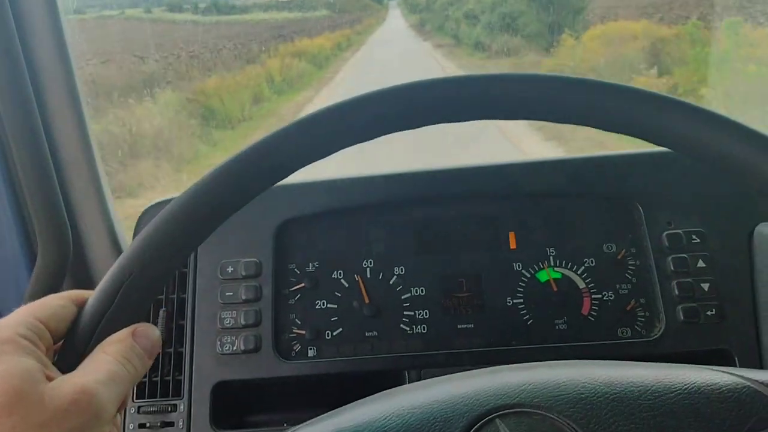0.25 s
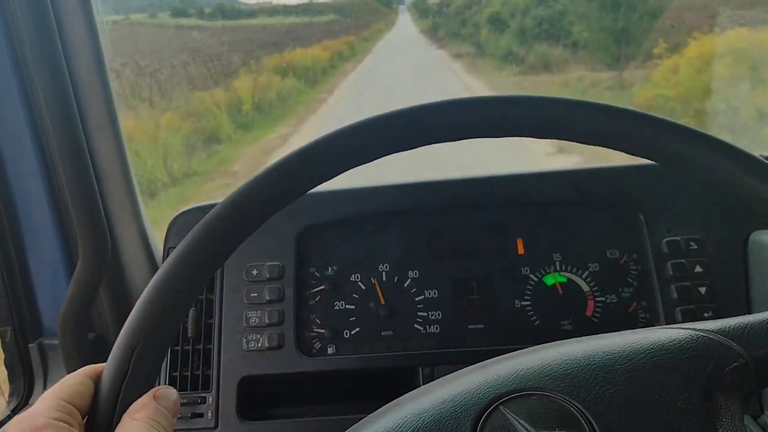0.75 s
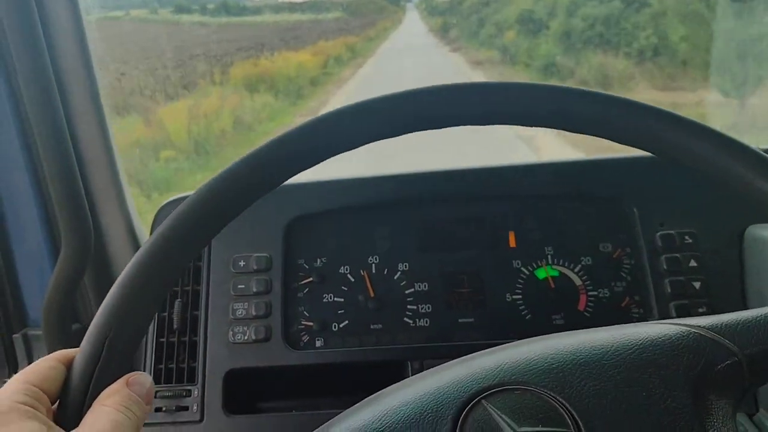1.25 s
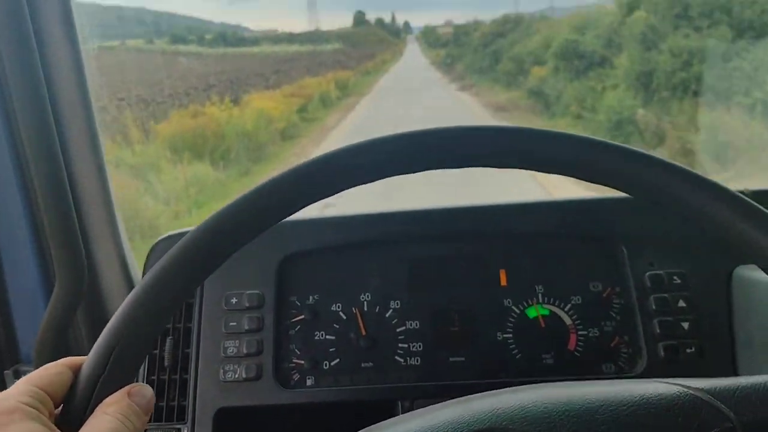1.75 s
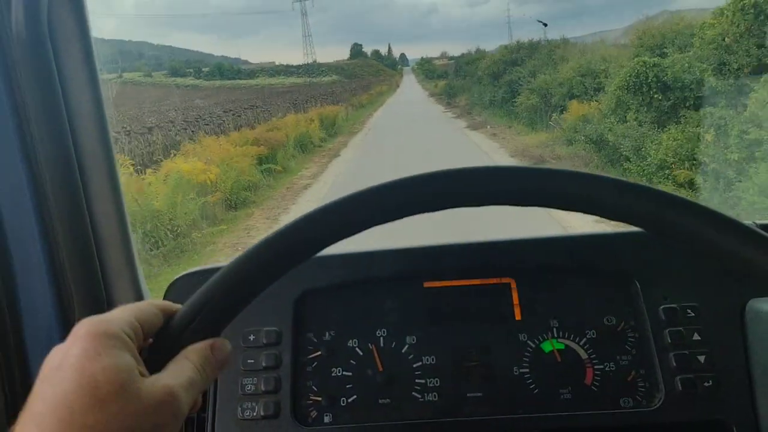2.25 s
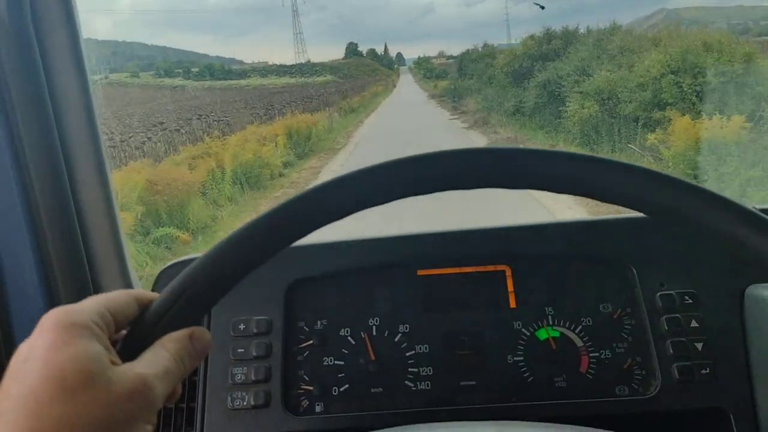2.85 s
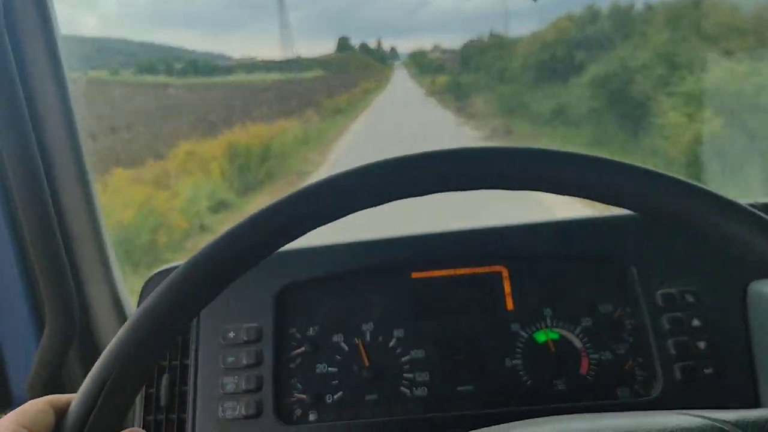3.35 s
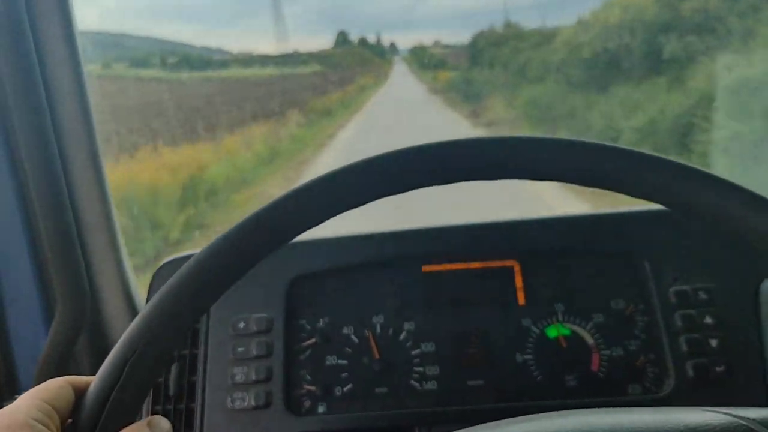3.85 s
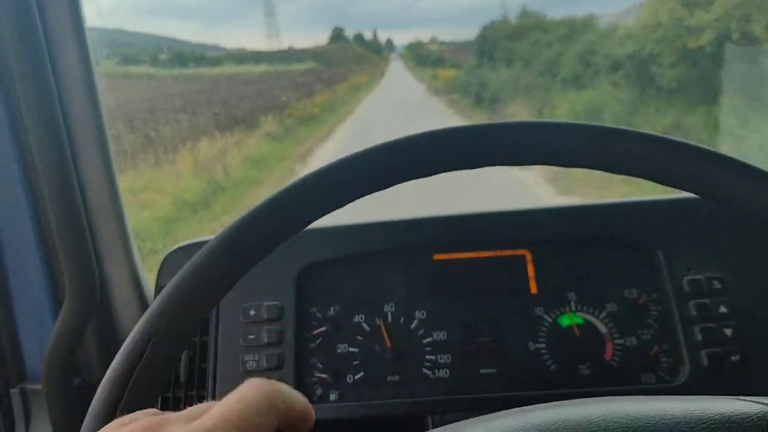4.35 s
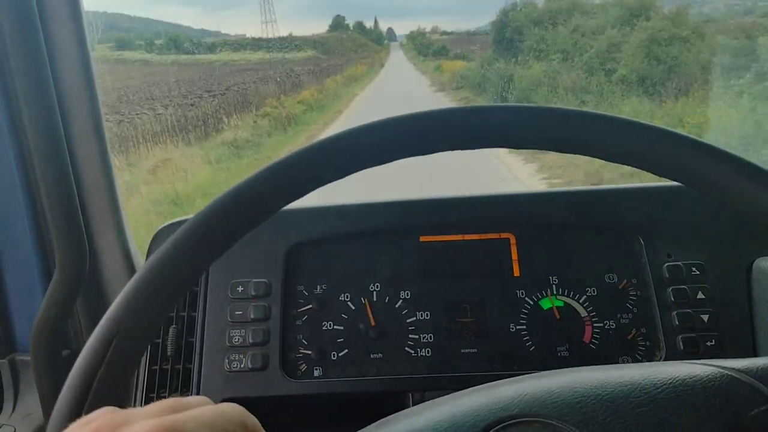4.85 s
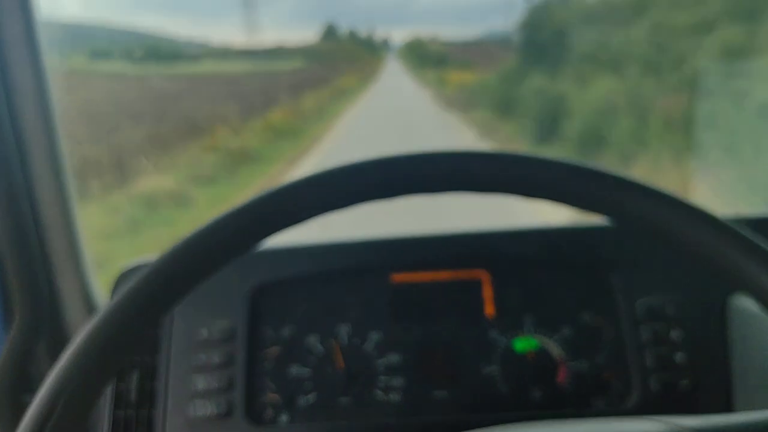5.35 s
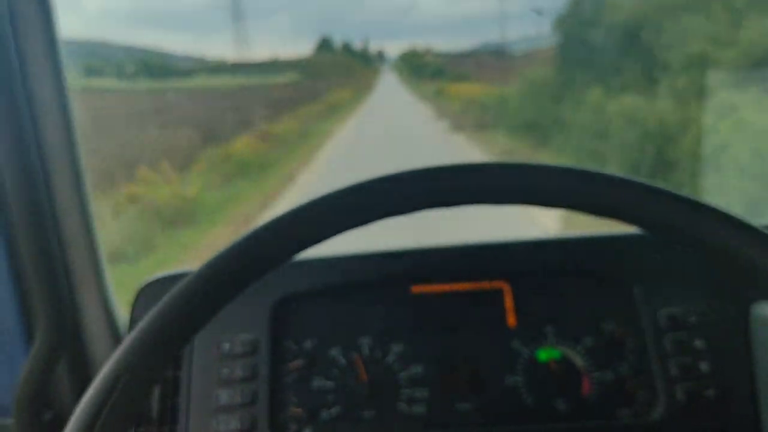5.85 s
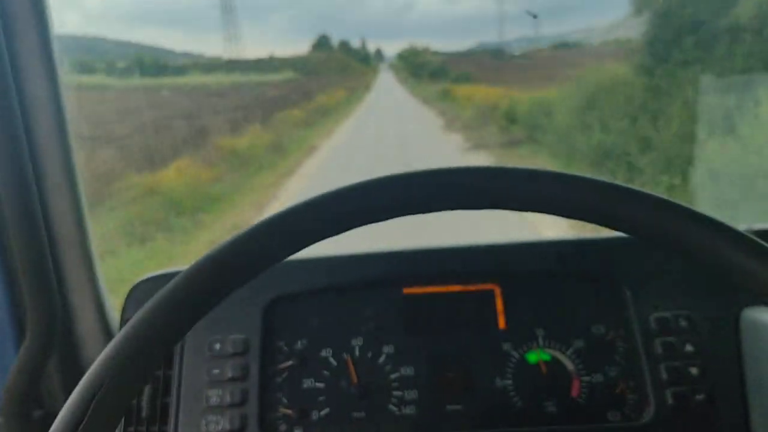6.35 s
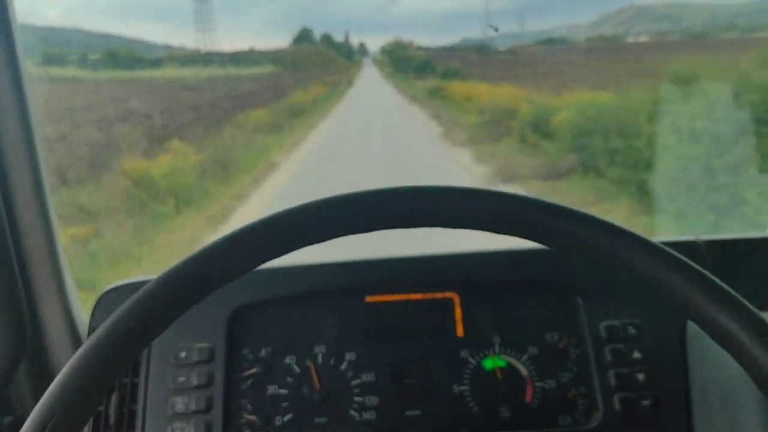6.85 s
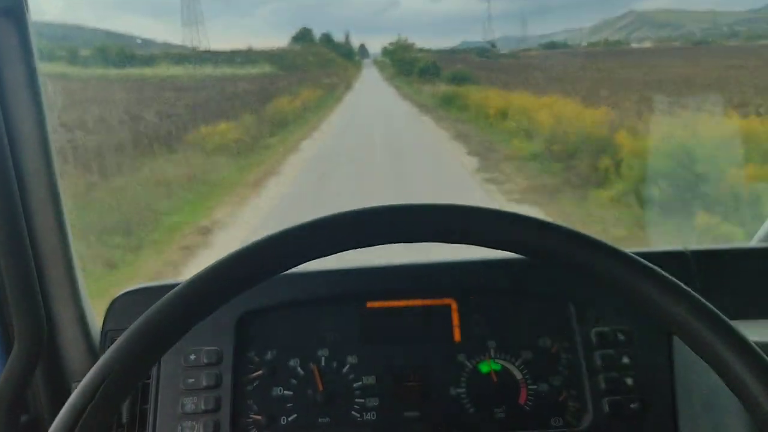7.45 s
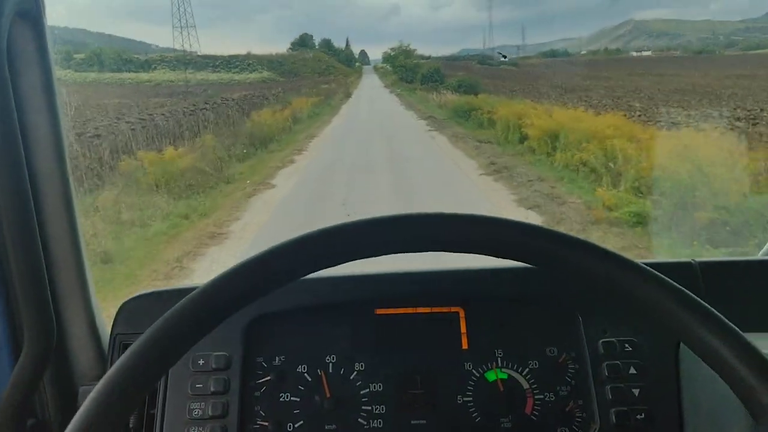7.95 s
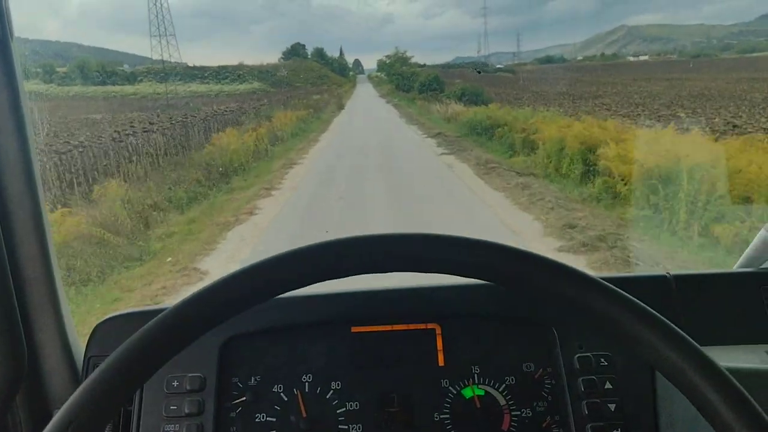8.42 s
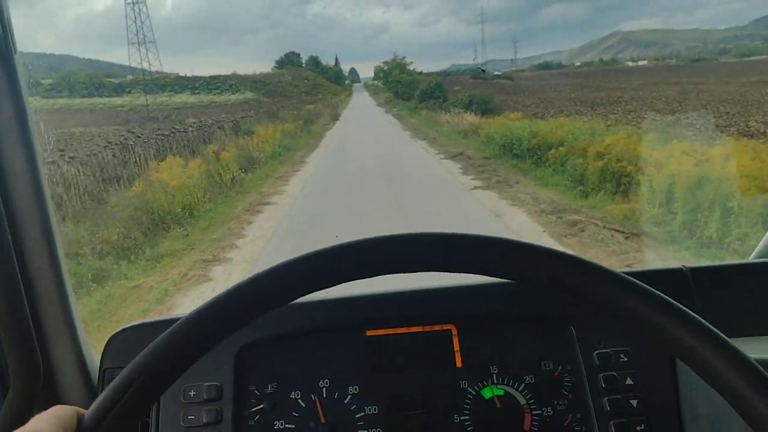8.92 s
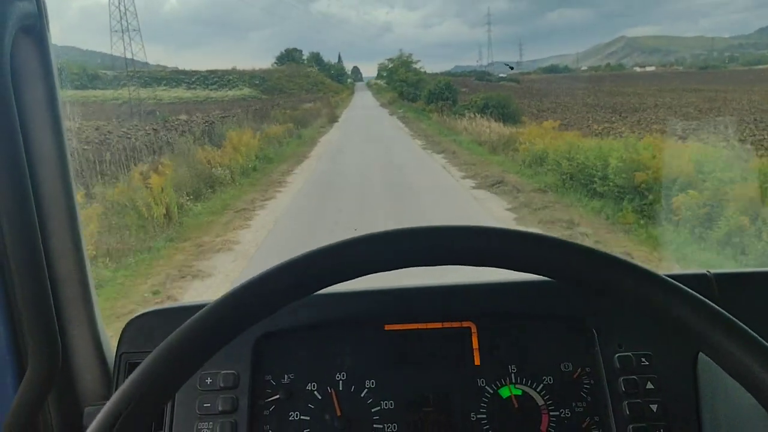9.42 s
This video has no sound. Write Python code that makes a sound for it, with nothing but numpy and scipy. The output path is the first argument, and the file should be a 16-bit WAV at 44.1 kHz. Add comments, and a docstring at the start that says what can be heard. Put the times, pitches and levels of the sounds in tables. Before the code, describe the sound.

From inside a truck cab, a diesel engine booms at constant speed, mixed with humming tyres, road roar and a light hiss of air. Bumps gently swell the low rumble. A short, bright plastic click comes near the start, and the trim gives brief, faint squeaks on the rougher stretch. The road noise then eases slightly as the truck keeps cruising.

```python
"""Inside the cab of a heavy truck on a narrow country road, its six-cylinder diesel near 1330 rpm.
The firings boom through the cab, the blocks of the tyre tread hum, and the cab rumbles on its mounts
over road roar and air hiss. On the rougher first stretch the seat and trim stick and slip in small
squeaks, and a loose plastic piece snaps once."""
import sys
import numpy as np
from scipy import signal
from scipy.fft import rfft, irfft
from scipy.io import wavfile
from scipy.ndimage import uniform_filter1d, map_coordinates

SR = 44100
rng = np.random.default_rng(int(sys.argv[2]) if len(sys.argv) > 2 else 0)


def generate_wav(signal):
    """Clip the signal to [-1, 1] and save it as 16-bit WAV at the path in sys.argv[1]."""
    frames = np.transpose(np.atleast_2d(signal))
    scaled = np.clip(frames, -1, 1) * 32767
    pcm = np.round(scaled).astype(np.int16)
    wavfile.write(sys.argv[1], SR, pcm)


N = 426888
TIME = np.arange(N) / SR
FREQS = np.arange(N // 2 + 1) * SR / N
SIDES = np.array([[1], [-1]])  # left, right
TOP_HZ = 15720

# The driver holds the speed and eases off a little: time_s, firing_hz, load_db (0 is steady cruise)
DRIVING = [(0.0, 65.96, 5), (0.7, 66.03, 2), (1.4, 66.57, 1.5), (2.1, 66.41, 0.3), (3.4, 66.48, 0),
           (4.8, 66.63, -0.1), (6.2, 66.73, -0.5), (7.6, 66.58, -1.5), (8.6, 66.6, -0.5), (9.68, 66.52, 0)]
# How much louder the left side is than the right: frequency_hz, left_minus_right_db
BALANCE = [(25, -1.8), (70, 1), (135, -1.5), (210, 1), (500, -2), (1100, -2.5), (2000, -6.5), (3500, -5),
           (5400, -5), (6700, 0), (7800, 5.5), (9500, 1.5), (10800, 0), (14000, 5.3)]


def undb(db):
    """Turn decibels into a gain to multiply by."""
    return 10 ** (np.asarray(db) / 20)


def unit(x):
    """Scale a signal to an average strength (rms) of 1."""
    return x / np.sqrt(np.mean(x ** 2))


def curves(table):
    """Turn each column of a timed table into one value per sample."""
    times, *columns = np.transpose(table)
    return [np.interp(TIME, times, column) for column in columns]


def colour(points):
    """Gain at every frequency, from rows of frequency_hz, level_db."""
    hz, db = np.transpose(points)
    return undb(np.interp(np.log(np.maximum(FREQS, 1)), np.log(hz), db))


def ringing(modes, hz=FREQS):
    """Gain of an object that rings: one peak for each of its resonances."""
    return sum(undb(db) / (1 + ((hz - centre) / width) ** 2) for centre, width, db in modes)


def wander(rate):
    """A smooth random curve of typical size 1 that changes about rate times a second."""
    steps = rng.standard_normal(int(N / SR * rate) + 4)
    coarse = map_coordinates(steps, [TIME[::64] * rate + 1], order=3)
    return unit(np.interp(TIME, TIME[::64], coarse))


def left_lead(hz):
    """How far the wave on the left runs ahead of the right, in radians."""
    # Head start on the left, shortened in the bass by standing waves: frequency_hz, lead_s
    leads = [(60, .0003), (130, .0005), (210, .00008), (600, .00016), (710, .00022), (830, .00038),
             (1050, .00051)]
    return 2 * np.pi * hz * np.interp(hz, *np.transpose(leads))


def cab_noise(gain):
    """Noise filling the cab: part reaches the left side first, part arrives from all round."""
    # How alike the two sides sound: frequency_hz, shared_fraction (capped at 1 below)
    likeness = [(40, 1.1), (120, 0.9), (230, 0.8), (330, 0.88), (500, 0.68), (1000, 0.49), (2000, 0.28),
                (4000, 0.17), (8000, 0.08), (13000, 0.13)]
    hz, share = np.transpose(likeness)
    common = np.interp(np.log(FREQS + 1), np.log(hz), np.clip(share, 0, 1))
    noise = rfft(rng.standard_normal((3, N)))
    direct = noise[2] * np.exp(.5j * SIDES * left_lead(FREQS))
    stereo = np.sqrt(common) * direct + np.sqrt(1 - common) * noise[:2]
    return unit(irfft(stereo * gain * colour(BALANCE) ** (SIDES / 2), N))


def engine(boom_db=-28, flutter_db=0.38, flutter_rise_db=0.0261, phase_wander=.006):
    """Six unequal cylinders repeat every two turns, making a stack of tones; higher ones waver more."""
    # Engine tones: order (times the cycle rate; 6 is the firing boom), level_db (relative to the boom)
    tones = [(2, -6), (3, -10.5), (6, 0), (9, -23), (12, -9.5), (13, -27), (15, -24.5), (17, -24),
             (18, -21), (21, -26), (24, -22.5), (27, -30), (29, -28.5), (33, -27), (39, -33), (40, -26.5),
             (53, -31), (55, -26.5), (57, -29), (60, -32), (64, -25), (67, -39), (73, -29.5), (79, -28),
             (87, -33)]
    # Tones that grow as the engine works harder: order, db_per_load_db
    load_growth = [(6, 1), (24, 1.3), (27, 2)]
    firing_hz, load_db = curves(DRIVING)
    cycle = 2 * np.pi * np.cumsum(firing_hz / 6) / SR
    out = np.zeros((2, N))
    for order, db in tones:
        hz = order * np.mean(firing_hz) / 6
        phase = order * (cycle + phase_wander * wander(7)) + rng.uniform(0, 2 * np.pi)
        level_db = boom_db + db + load_db * dict(load_growth).get(order, 0)
        waver_db = (flutter_db + flutter_rise_db * order) * wander(11)
        side_db = SIDES * np.interp(hz, *np.transpose(BALANCE)) / 2
        out += undb(level_db + waver_db + side_db) * np.sin(phase + SIDES * left_lead(hz) / 2)
    return np.sqrt(2) * out + diesel_knock(cycle, load_db)


def diesel_knock(cycle, load_db, cruise_db=-51.5, db_per_load_db=1.46):
    """Clatter rings the engine block, harder under load; the cab floor smears it to a soft flutter."""
    # Resonances of the engine block: pitch_hz, width_hz, level_db
    block_modes = [(2005, 46, 1), (2120, 53, -3), (2247, 64, 0.5), (3900, 230, -11), (6200, 150, -12)]
    flutter = 1 + 0.15 * np.cos(6 * cycle) + 0.09 * np.cos(2 * cycle)  # each firing, each turn
    return cab_noise(ringing(block_modes)) * flutter * undb(cruise_db + db_per_load_db * load_db)


def tyre_hum(hum_db=-32.5, rise_db=2, rise_s=3, flutter_db=1.5, octave_db=-22, pan_db=1.1):
    """Tread blocks (lugs) strike the road in step with the engine; the hum wavers with the road."""
    # Brief swells and dips of the hum: centre_s, half_length_s, change_db
    swells = [(0.0, .15, -7), (1.22, .08, -8), (1.7, .2, -3), (2.22, 0.19, -11.5), (3.05, 0.14, 2.5),
              (4.3, 0.064, -10), (5.25, .2, -3), (5.647, .2, -8), (6.05, 0.089, 6), (6.6, .16, -9),
              (7.396, .1, -6.5), (8.33, .1, -5), (8.65, .18, 2.5), (9.3, .1, 3.5)]
    lugs_per_firing, lugs_per_wheel = 3.187, 50
    firing_hz, _ = curves(DRIVING)
    phase = 2 * np.pi * np.cumsum(lugs_per_firing * firing_hz) / SR + .35 * wander(6)
    level_db = hum_db - rise_db * np.maximum(1 - TIME / rise_s, 0)
    level_db += sum(db * np.maximum(1 - np.abs(TIME - s) / half_s, 0) for s, half_s, db in swells)
    level_db += flutter_db * wander(20)
    wheel_pulse = 1 + 0.2 * np.sin(phase / lugs_per_wheel)  # one swell per wheel turn
    hum = np.sin(phase + SIDES * 0.068) + undb(octave_db) * np.sin(2 * phase + wander(12))
    return np.sqrt(2) * hum * wheel_pulse * undb(level_db + SIDES * pan_db / 2)


def cab_shake(steady_db=-23.5, uneven_db=2, bump_db=-1, attack_s=0.04, release_s=0.099, smooth_s=0.15):
    """The cab rocks on its mounts all the time; each bump drives it harder, holds and dies away."""
    # Bumps in the road: start_s, length_s, level_db (before bump_db is added)
    bumps = [(0.282, 0.091, -18), (1.197, 0.189, -16.5), (1.712, 0.43, -16.5), (2.451, 0.032, -19.5),
             (3.013, 0.039, -19), (3.331, 0.44, -19), (4.32, 0.066, -19), (4.739, 0.45, -18.5),
             (5.619, 0.171, -17), (6.162, 0.062, -17.5), (6.557, 0.24, -18), (7.387, 0.03, -19.5),
             (7.583, 0.48, -18), (8.267, 0.038, -20), (8.525, 0.55, -16), (9.471, 0.048, -18)]
    # The deep rumble of the rocking cab: frequency_hz, level_db
    rumble_spectrum = [(2, -5), (7, -12), (12, 1.5), (18, 6), (25, -3.5), (33, -5.5), (41, -20.5),
                       (60, -25.5), (150, -79)]
    drive = undb(steady_db + uneven_db * wander(7))
    for start_s, length_s, db in bumps:
        corners = [start_s - attack_s, start_s, start_s + length_s, start_s + length_s + release_s]
        drive = np.maximum(drive, undb(db + bump_db) * np.interp(TIME, corners, [0, 1, 1, 0]))
    rumble = cab_noise(colour(rumble_spectrum))
    strength = np.sqrt(uniform_filter1d(np.mean(rumble ** 2, axis=0), int(smooth_s * SR)))
    return rumble / strength * drive  # even out the noise so that the drive sets its loudness


def road_roar(start_db=-32.5, fall_db_per_s=0.28, patchy_db=0.82, ring_db=-41):
    """The road roars through the floor and rings the cab, fading as the surface gets smoother."""
    # Road noise inside the cab: frequency_hz, level_db
    roar_spectrum = [(25, -38), (48, 9.5), (74, 16), (88, 9.5), (118, 9), (145, 2.5), (190, 4), (270, -1),
                     (420, -0.5), (520, -3), (680, -4), (830, -7), (970, -5.5), (1400, -22.5), (4000, -56)]
    # Resonances of the cab's air and panels: pitch_hz, width_hz, level_db
    cab_modes = [(108, 10.5, 0), (222, 15.8, 0), (361.4, 9.3, -6), (435.5, 15.4, -11), (570, 38, -16.5)]
    surface = undb(start_db - fall_db_per_s * TIME + patchy_db * wander(12))
    roar = cab_noise(colour(roar_spectrum)) * surface
    rings = cab_noise(ringing(cab_modes)) * undb(ring_db) * unit(surface)
    return roar + rings


def air_hiss(cruise_db=-41.5, db_per_load_db=0.43, gusty_db=0.5, ripple_db=1.42, spacing_hz=70):
    """Air hisses past the glass and into the engine's intake, more under load."""
    # The rushing air: frequency_hz, level_db
    hiss_spectrum = [(350, -8), (950, 3), (1170, 3), (1400, 4), (1800, 1.4), (2350, 0.5), (2800, -2),
                     (3900, -4.5), (4600, -5), (7500, -5.5), (8800, -9.5), (10300, -11), (11200, -14),
                     (15500, -19)]
    _, load_db = curves(DRIVING)
    # Reflections between glass and dashboard lay fine peaks and dips across the frequencies.
    steps = rng.standard_normal(1024)
    ripple = undb(ripple_db * np.interp(FREQS / spacing_hz, np.arange(len(steps)), steps))
    hiss = cab_noise(colour(hiss_spectrum) * ripple)
    return hiss * undb(cruise_db + db_per_load_db * load_db + gusty_db * wander(20))


def squeaks(jitter=.003, rasp_jitter=.017, sag=.008, uneven_db=3):
    """Trim sticks and slips: unsteady tones that sag in pitch and scrape where the grip is poor."""
    # The main squeaks: centre_s, half_length_s, pitch_hz, level_db, bright_hz, rasp (0 tone, 1 scrape)
    slips = [ (.725, 0.096, 580, -47.5, 7000, .85), (1.26, 0.028, 2300, -40, 5600, 0.1),
             (1.289, .045, 570, -38.5, 520, 0.15), (1.29, .042, 1440, -46, 2900, .25),
             (2.548, 0.04, 851, -44, 8000, .7), (2.567, .06, 1760, -42, 1600, 0.3),
             (2.596, 0.068, 942, -39, 3100, 0.24), (2.86, .039, 1220, -51, 3700, .25),
             (3.141, .036, 1110, -41.5, 1200, .02), (3.165, 0.062, 1080, -41, 2600, .15),
             (3.16, 0.054, 1080, -46.5, 8500, 0.4), (3.207, .037, 1220, -43.5, 3300, 0.55),
             (3.388, 0.054, 2267, -40.5, 7000, 0.1), (4.157, .038, 1127, -46, 5500, .15),
             (4.331, .057, 1577, -50, 3100, .2), (4.499, .047, 710, -46, 3400, .3),
             (4.662, 0.044, 1127, -45, 5500, .25), (5.222, .037, 1083, -47, 4200, .45)]
    out, wobble, grit = np.zeros(N), wander(260), rng.standard_normal(N)
    for centre_s, half_s, hz, db, bright_hz, rasp in list(slips) + faint_squeaks():
        span = np.abs(TIME - centre_s) < half_s
        progress = (TIME[span] - centre_s) / half_s  # -1 to 1
        pitch_hz = hz * (1 - sag * progress + (jitter + rasp_jitter * rasp) * wobble[span])
        phase = 2 * np.pi * np.cumsum(pitch_hz) / SR
        # The contact point creeps, so each overtone swells and fades on its own.
        creep = rng.standard_normal((40, 7))
        tone = 0
        for k in range(1, int(TOP_HZ / hz)):
            swell = undb(uneven_db * np.interp(progress, np.linspace(-1, 1, 7), creep[k]))
            tone += trim_gain(k * hz, bright_hz) * swell * np.sin(k * phase)
        scrape_gain = trim_gain(np.fft.rfftfreq(len(progress), 1 / SR), bright_hz)
        scrape = irfft(rfft(grit[span]) * scrape_gain, len(progress))
        pressure = np.cos(np.pi * progress / 2) ** 4
        out[span] += undb(db) * pressure * (np.sqrt(1 - rasp) * unit(tone) + np.sqrt(rasp) * unit(scrape))
    return out


def faint_squeaks(from_s=.4, to_s=5.4, count=7, half_s=.045, level_db=-51, rasp=.4, spread_octaves=.45):
    """Rows for small squeaks scattered over the rough stretch, each with its own pitch and brightness."""
    slot_s = (to_s - from_s) / count
    rows = []
    for slot, (when, slip, bright) in enumerate(rng.uniform(-1, 1, (count, 3))):
        centre_s = from_s + slot_s * (slot + (when + 1) / 2)
        pitch_hz = 1200 * 2 ** (spread_octaves * slip)
        bright_hz = 3500 * 2 ** (spread_octaves * bright)
        rows.append((centre_s, half_s, pitch_hz, level_db, bright_hz, rasp))
    return rows


def trim_gain(hz, bright_hz, width_octaves=.65, dull_hz=10500):
    """How the trim answers a frequency: a broad rise set by the contact, with its own ringing on top."""
    # Resonances of the trim panel: pitch_hz, width_hz, level_db (relative to the broad rise)
    trim_modes = [(3160, 260, -2), (5650, 130, 2), (7000, 230, 5.5), (9300, 230, -6)]
    broad = 1 / (1 + (np.log2(np.maximum(hz, 1) / bright_hz) / width_octaves) ** 2)
    return broad * (1 + ringing(trim_modes, hz)) / np.hypot(1, (hz / dull_hz) ** 4)


def cab_echo(x, fade_s=0.13, echo_db=-10, pan_db=-2):
    """Glass and dashboard throw back a short dense echo, different on each side."""
    t = TIME[:SR // 5]
    tail = rng.standard_normal((2, len(t))) * undb(-60 * t / fade_s)
    tail /= np.sqrt(np.sum(tail ** 2, axis=1, keepdims=True))
    echo = signal.fftconvolve(x[None], tail, axes=1)[:, :N]
    return (x + undb(echo_db) * echo) * undb(SIDES * pan_db / 2)


def plastic_snap(pan_db=1):
    """A loose plastic piece catches, snaps over and settles with short bright cracks."""
    # The cracks: start_s, level_db, fade_s (time to fall by 60 dB)
    cracks = [(1.0385, -26, .045), (1.044, -32, .075), (1.088, -48, .06)]
    # The bright sound of the plastic: frequency_hz, level_db
    crack_spectrum = [(800, -24), (2500, -10), (3800, -3), (4800, -6.5), (6400, 2), (8000, 2.5),
                      (10000, -4), (15000, -12)]
    loudness = sum(undb(db - 60 * np.abs(TIME - s) / fade_s) * (TIME >= s) for s, db, fade_s in cracks)
    noise = unit(irfft(rfft(rng.standard_normal((2, N))) * colour(crack_spectrum), N))
    return loudness * noise * undb(SIDES * pan_db / 2)


def scene():
    """Everything heard from the driver's seat."""
    cruising = engine() + tyre_hum() + cab_shake() + road_roar() + air_hiss()
    return cruising + cab_echo(squeaks()) + plastic_snap()


def record(dry):
    """Cut the treble steeply above TOP_HZ."""
    return signal.sosfilt(signal.ellip(12, .1, 80, TOP_HZ, fs=SR, output="sos"), dry)


dry = scene()
out = record(dry)
generate_wav(out)
```